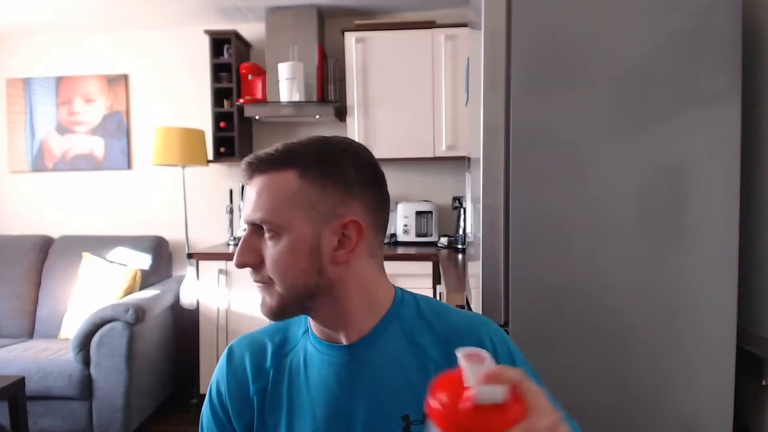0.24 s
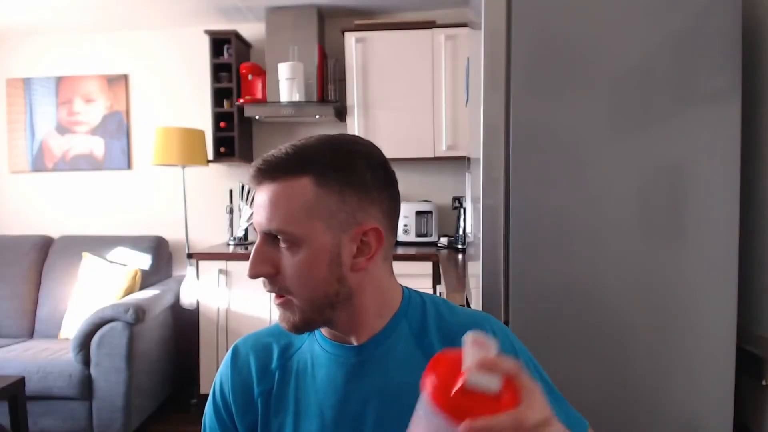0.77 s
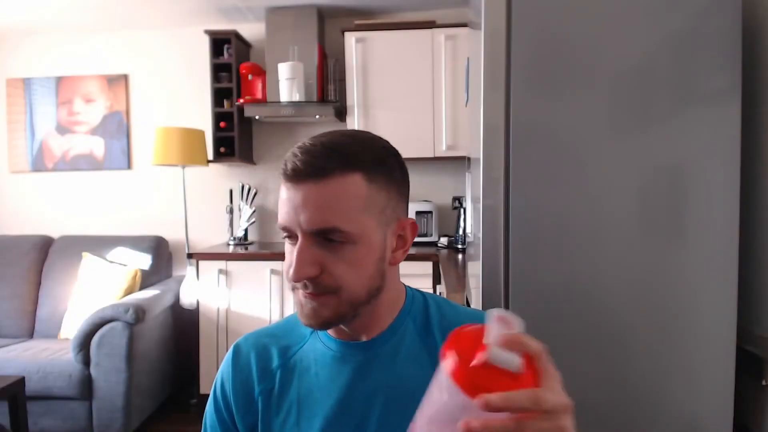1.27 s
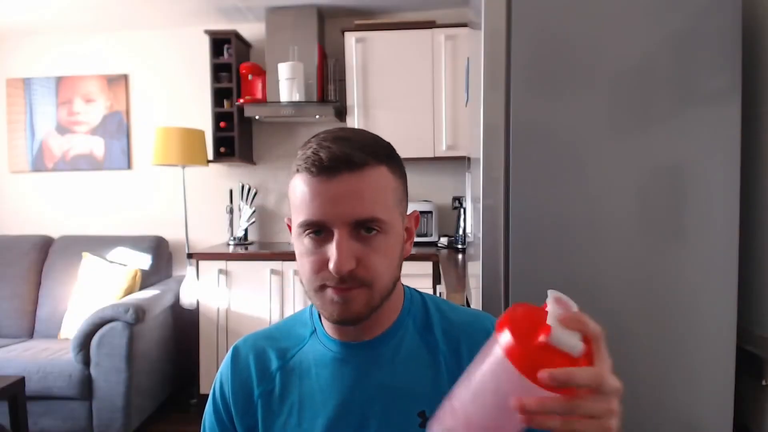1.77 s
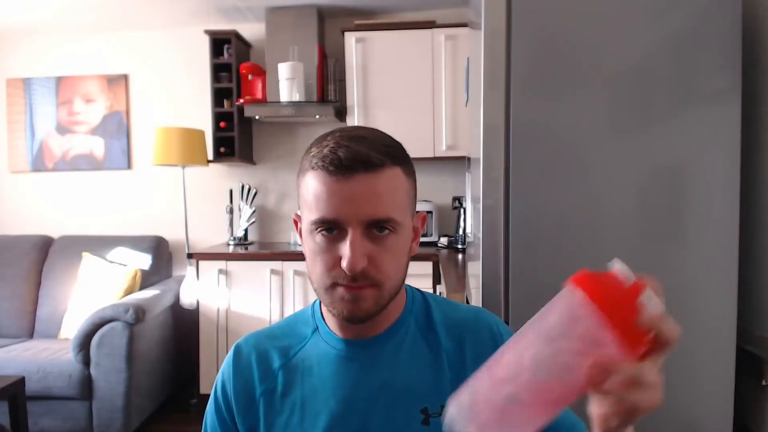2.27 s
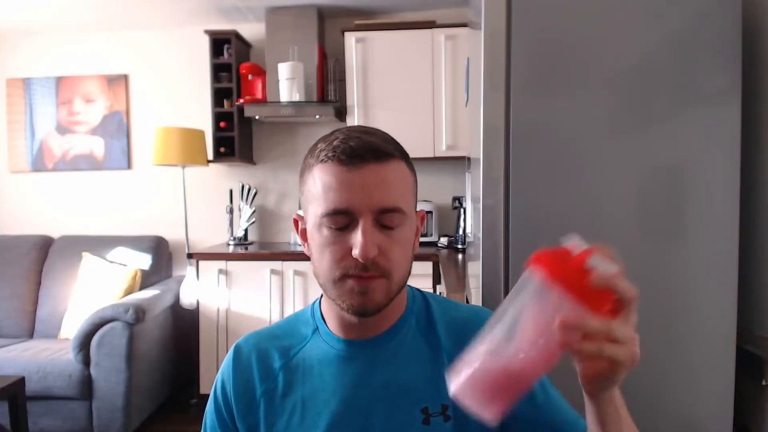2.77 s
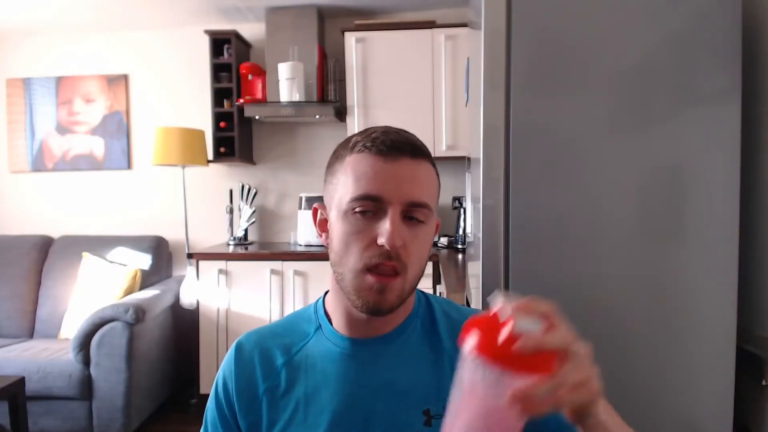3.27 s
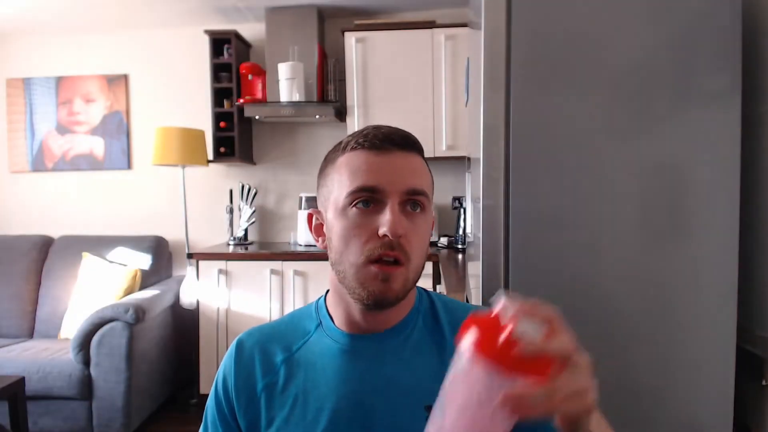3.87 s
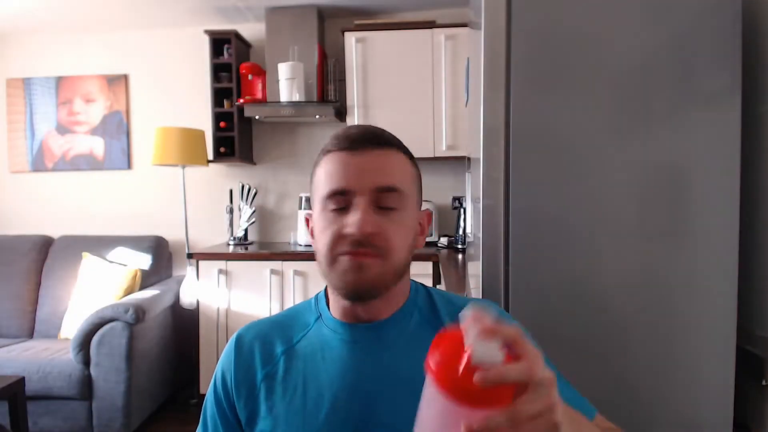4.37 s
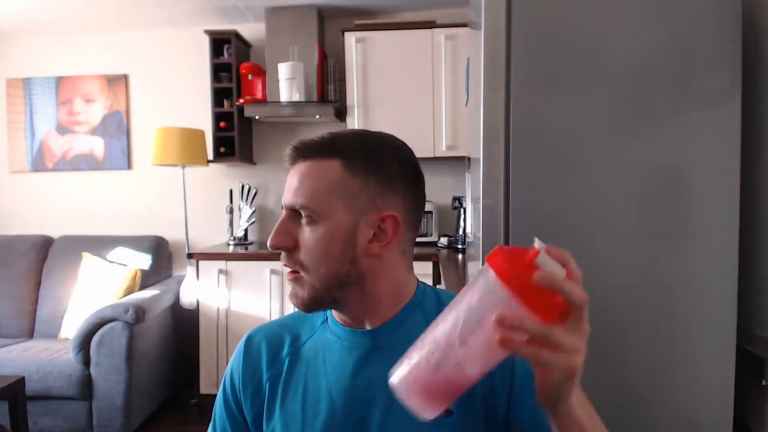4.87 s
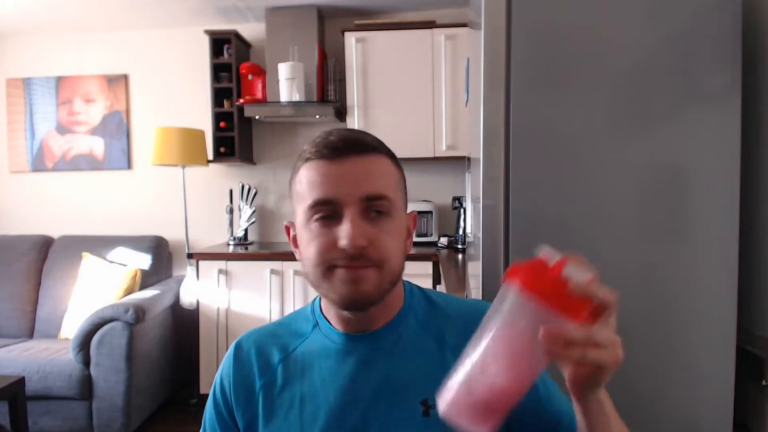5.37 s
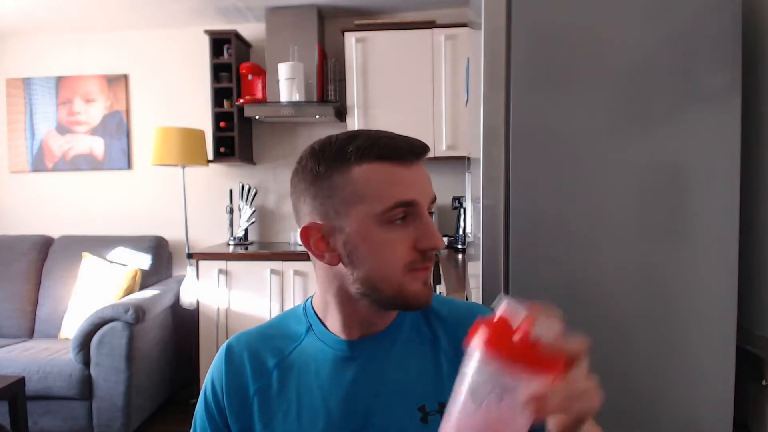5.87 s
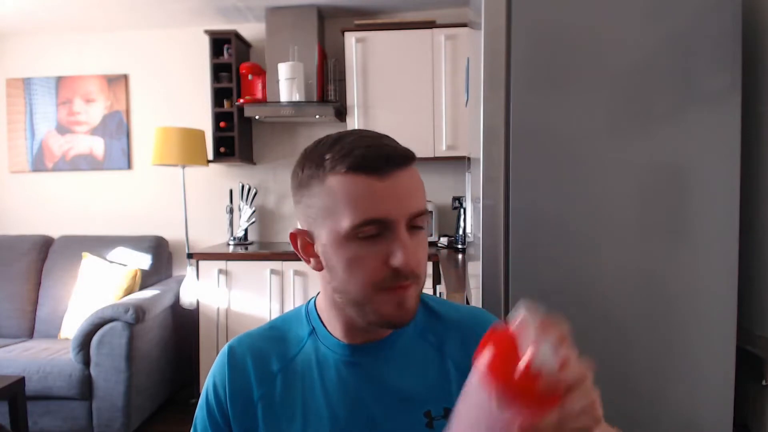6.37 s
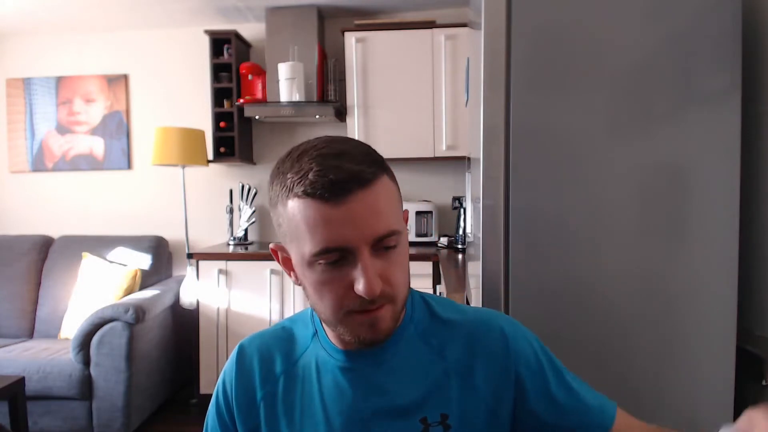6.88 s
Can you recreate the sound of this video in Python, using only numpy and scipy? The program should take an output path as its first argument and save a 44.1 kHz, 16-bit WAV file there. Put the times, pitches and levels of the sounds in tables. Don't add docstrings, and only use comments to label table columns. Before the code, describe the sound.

Vigorous shaking of a half-full plastic bottle indoors: hollow knocks, bright wire rattles and frothy liquid slosh, about three slams a second by the end.

```python
import sys
import numpy as np
from scipy import signal
from scipy.fft import rfft, irfft, next_fast_len
from scipy.io import wavfile
from scipy.ndimage import uniform_filter1d, map_coordinates

SR = 44100
rng = np.random.default_rng(int(sys.argv[2]) if len(sys.argv) > 2 else 0)


def gain_from_decibels(decibels):
    exponent = np.asarray(decibels, float) / 20
    return 10 ** exponent


def dump_mix(stems):
    frames = np.atleast_2d(stems).T
    limited = np.clip(frames, -1, 1)
    pcm = np.round(limited * 32767).astype(np.int16)
    wavfile.write(sys.argv[1], SR, pcm)


N = 314768

# (time [s], level [dB])
ARM_AIR = [
    (0, -47.5),
    (.7, -44.5),
    (1.15, -51),
    (1.24, -42),
    (1.33, -46),
    (2.4, -54.5),
    (3.7, -53),
    (4.8, -53),
    (6.1, -51),
    (7.14, -58.5),
]
# (frequency [Hz], density [dB per Hz])
AIR_SPECTRUM = [(3, -1), (6, 10), (20, -7.5), (40, -4), (70, -66), (150, -90)]
# (frequency [Hz], density [dB per Hz])
ROOM_TONE_SPECTRUM = [(30, -6), (60, 1.5), (120, -2.5), (250, -3.5), (400, -25), (1000, -28)]
# (time [s], peak level [dB])
JOLTS = [(1.818, -64), (2.48, -46), (3.045, -48), (3.332, -50), (4.099, -61), (4.49, -54), (4.832, -52),
         (5.091, -44), (5.36, -50), (5.62, -54), (5.92, -47), (6.488, -56)]

# (time [s], level [dB])
SLOSH = [(.06, -41.5), (.34, -53.5), (.65, -55), (1.16, -47.5), (1.6, -49.5), (2.0, -52), (2.58, -48),
         (2.9, -52), (3.5, -46.5), (3.73, -47), (4.4, -48), (4.84, -47.5), (5.05, -60), (5.5, -51),
         (5.75, -56.5), (5.95, -46), (6.57, -60), (7.05, -48.5)]
# (frequency [Hz], density [dB per Hz])
GURGLE_SPECTRUM = [(150, -79), (300, -15.5), (550, -7), (900, 1.5), (1350, 1.5), (2200, -3.5), (3200, -4.5),
                   (5000, -61)]
# (frequency [Hz], density [dB per Hz])
FIZZ_SPECTRUM = [(2500, -13.5), (3600, 0.5), (4400, 3), (6000, -5.5), (8000, -5.5), (10000, -15),
                 (16000, -19.5)]
FROTH_DB = -4.5

# (frequency [Hz], width [Hz], level [dB])
HOLLOW_MODES = [(350, 84.5, 2), (559.5, 49, 3.5), (760, 32, -6.5)]
# (frequency [Hz], width [Hz], level [dB])
WALL_MODES = [(870, 96, -4.5), (1100, 147, -1), (1380, 136, -2), (1850, 100, -0.5), (2257, 260, -4),
              (3240, 470, -4.5)]
# (frequency [Hz], width [Hz], level [dB])
LID_MODES = [(4090, 780, 2), (4820, 1550, 0), (8090, 2150, -6.5), (13700, 2500, -14.5)]

# (time [s], peak level [dB], bright snap [dB], air pocket frequency [Hz])
SKIDS = [(.001, -24.5, 0, 1400), (6.284, -28.5, -6, 1400), (.742, -29.5, -6, 1610), (.981, -28, -4, 1397),
         (1.241, -29, -6.5, 1380), (1.734, -22.5, -5.5, 1495), (2.748, -34.5, -11, 1380),
         (2.775, -39, -5, 1400), (3.047, -31.5, -4.5, 1790), (5.357, -33, -3.5, 785),
         (6.141, -30.5, 1, 1870), (6.199, -27, -0.5, 1880), (6.501, -40, -13, 1440), (6.567, -39, -4, 1380),
         (6.707, -40, -6, 956)]
# (time [s], peak level [dB], hollow thump [dB], bright snap [dB], air pocket frequency [Hz])
SLAMS = [(.008, -20.5, -21, 1, 2320), (.395, -22, -45, -6.5, 1850), (.76, -23.5, -20, -1.5, 1370),
         (1.619, -20.5, -33, -9, 1316), (1.832, -21.5, -17, -13.5, 1030), (2.198, -17, -12, -5.5, 873),
         (2.498, -25, -26, -17, 787), (2.792, -16.5, -12.5, -6, 1383), (3.107, -22.5, -16, -7, 1400),
         (3.412, -22, -20, -9.5, 1580), (3.689, -14.5, -15, -8.5, 1010), (3.953, -17, -17, -8.5, 1290),
         (4.2218, -24.5, -19, -9, 1190), (4.278, -22.5, -13, -6, 923), (4.51, -16.5, -14.5, -13, 1387),
         (4.867, -21, -19, -11.5, 1177), (5.106, -15.5, -18.5, -11, 1275), (5.382, -17.5, -20.5, -5, 1870),
         (5.672, -19, -16.5, -11.5, 1435), (5.971, -24.5, -11.5, -9, 1697), (6.271, -18.5, -12, -10, 1380),
         (6.512, -24.5, -5, -6.5, 910), (6.796, -20, -6.5, -7.5, 990), (7.017, -20.5, -19.5, -10, 1070)]
# (time [s], peak level [dB], bright snap [dB])
RATTLES = [(0.084, -42, -6), (0.222, -29, -11), (.571, -33, -10.5), (.624, -26, -14), (0.675, -33.5, -6),
           (.789, -33, -10), (.829, -34, -20), (.862, -27, -6.5), (1.081, -34, -5), (1.093, -29.5, -7),
           (1.136, -27, -8.5), (1.349, -27.5, -7.5), (1.467, -33, -23), (1.508, -30, -8), (1.553, -37, -12),
           (1.643, -42.5, -2), (2.062, -59, 12), (2.607, -48, -30), (3.608, -38.5, -19), (3.937, -39, -31),
           (3.876, -55, -11), (4.09, -38, -10), (4.956, -59, -14), (5.351, -31, -13), (5.529, -39, -4),
           (5.722, -53, -11), (6.683, -34.5, -6)]
# (time [s], peak level [dB], bright snap [dB], air pocket frequency [Hz])
KNOCKS = [(0.096, -23, -4, 1310), (0.502, -26.5, -6.5, 1350), (.651, -26.5, -4, 1140),
          (1.041, -25, -8, 2400), (1.32, -30, -9, 2350), (1.413, -33.5, -34, 920), (1.875, -24, -7, 1096),
          (1.968, -26, -8.5, 1070), (2.017, -32, -9.5, 1630), (2.104, -30, -6, 990),
          (2.149, -34.5, -3, 970), (2.242, -35, -23, 1440), (2.276, -28, -11, 1275),
          (2.392, -33.5, -6.5, 1000), (2.568, -30, -10, 1380), (2.941, -29, -2.5, 960),
          (2.965, -36, 0, 980), (3.067, -30, -30, 1300), (3.339, -25, -9.5, 1137), (3.647, -33, -8, 1057),
          (4.374, -38, -10, 1150), (4.688, -41, -3, 1240), (4.999, -29.5, -8.5, 1100),
          (5.283, -34.5, -4.5, 2030), (5.644, -26, -10, 1280), (5.888, -37.5, -14, 1820),
          (6.33, -30.5, -2.5, 1834), (6.617, -38, -29, 1140), (6.866, -33.5, -9, 1150),
          (6.913, -34, -10, 1000)]
# (time [s], peak level [dB])
SNAPS = [(.1281, -34), (0.2296, -24), (0.278, -27), (.497, -26), (0.837, -27), (1.117, -24), (1.233, -74),
         (1.395, -22), (1.6012, -45), (2.136, -82), (2.3518, -27), (2.4294, -26), (2.6, -23), (2.689, -47),
         (3.0335, -40), (3.76, -21.5), (4.112, -24), (4.16, -27), (4.2615, -23), (4.7663, -28),
         (5.2545, -28), (5.9184, -25.5), (6.0496, -26), (6.0721, -35), (6.094, -25), (6.433, -27),
         (6.754, -31)]
# (time [s], peak level [dB])
REBOUNDS = [(.4194, -32), (.6374, -24), (1.361, -30), (1.8517, -15), (2.5106, -14), (2.534, -16),
            (2.8134, -16), (4.5311, -15.5), (5.692, -21), (5.9988, -28), (6.351, -34), (7.0316, -11)]
SLAM_T60_S, KNOCK_T60_S, SKID_T60_S, RATTLE_T60_S = 0.065, 0.07, 0.16, 0.06
KNOCK_THUMP_DB, SKID_THUMP_DB, RATTLE_THUMP_DB = -24, -31.5, -19.5
SWIRL_POCKET_HZ = 1320

# (time [s], peak level [dB])
TICKS = [(0.7292, -38), (0.9687, -49), (1.0544, -60), (1.265, -33), (1.484, -50), (1.5529, -45),
         (2.1041, -38), (2.357, -42), (2.9138, -36), (3.1694, -32), (3.3494, -37), (3.6082, -38),
         (3.6774, -24), (3.8731, -50), (3.9883, -31), (4.0537, -28), (4.3745, -39), (4.4303, -28),
         (4.6229, -39), (4.6862, -32), (4.7014, -37), (4.9382, -32), (4.9551, -38), (5.0644, -40),
         (5.1294, -29), (5.4194, -33), (5.7488, -32), (5.8885, -34), (6.4961, -33), (6.6179, -34.5)]
WIRE_UNDER_SNAP_DB, WIRE_T60_S, WIRE_FROM_HZ = -17.5, 0.0064, 5100
TICK_GAIN_DB = -5
STRAY_PER_S, STRAY_DB, STRAY_SPREAD_DB = 31, -3.5, 1

# (time [s], length [s], level [dB])
SPRAYS = [
    (4.285, 0.15, -49),
    (1.6, 0.067, -49),
    (1.2, 0.057, -55),
    (2.64, 0.089, -58),
]
# (time [s], level [dB], first frequency [Hz], last frequency [Hz], length [s])
GLUGS = [
    (3.7, -46, 620, 450, .07),
    (1.585, -37, 1900, 1900, 0.0089),
    (4.11, -45, 3100, 3050, 0.0097),
    (2.1, -50, 2700, 2400, 0.017),
    (6.567, -47, 3200, 3270, 0.018),
    (3.3, -49, 1560, 950, .02),
]
# (frequency [Hz], t60 [s])
ROOM_DECAY = [(200, 0.17), (1500, 0.3), (10000, 0.12)]
# (frequency [Hz], gain [dB])
TREBLE_LIMIT = [(15000, 0), (15850, -2), (16050, -34), (16750, -40), (16900, -90)]


def unit(x):
    return x / np.sqrt(np.mean(x ** 2) + 1e-20)


def along(points, hz):
    f, v = np.transpose(points)
    return np.interp(np.log(hz + 1), np.log(f + 1), v)


def curves(rows):
    s, *cols = np.transpose(rows)
    return [np.interp(np.arange(N) / SR, s, c) for c in cols]


def wobble(rate):
    knots = rng.standard_normal(int(N * rate / SR) + 4)
    return map_coordinates(knots, [np.arange(N) * rate / SR])


def filtered(x, response):
    m = next_fast_len(N + SR // 2)
    return irfft(rfft(x, m) * response(np.fft.rfftfreq(m, 1 / SR)), m)[..., :N]


def resonances(modes):
    def response(f):
        total = 0
        for k, (centre, width, db) in enumerate(modes):
            damping = 1j * f * width
            total = total + (-1) ** k * gain_from_decibels(db) * damping / (centre ** 2 - f ** 2 + damping)
        return total
    return response


def hiss(spectrum):
    return unit(filtered(rng.standard_normal(N), lambda hz: gain_from_decibels(along(spectrum, hz))))


def wash(hits, level_db, t60):
    kicks = np.zeros(N)
    for s, db in hits:
        kicks[round(s * SR)] = gain_from_decibels(db + level_db)
    return signal.lfilter([1], [1, -gain_from_decibels(-60 / (t60 * SR))], kicks)


def background():
    hum_hz = 183 + 1.49 * wobble(20)
    hum = gain_from_decibels(-67.5 + 0.62 * wobble(14)) * np.sin(2 * np.pi * np.cumsum(hum_hz) / SR)
    jolts = uniform_filter1d(wash(JOLTS, level_db=-4, t60=0.11), size=300)
    tone = (gain_from_decibels(-65 + 2.2 * wobble(12.0)) + jolts) * hiss(ROOM_TONE_SPECTRUM)
    air = gain_from_decibels(curves(ARM_AIR)[0]) * hiss(AIR_SPECTRUM)
    return air + tone + hum


def bubbles(per_s, hz, octaves, cycles, spread_db):
    when, a, b, bulk = rng.random((int(per_s * N / SR), 4)).T[..., None]
    step = np.arange(200)
    turns = hz * 2 ** (octaves * (a + b - 1)) * step / SR
    fade = np.exp(-turns / cycles) * (1 - np.exp(-turns / 0.78))
    tone = np.sin(2 * np.pi * turns * (1 + 0.026 * turns)) * fade
    at = (when * N).astype(int) + step
    sizes = gain_from_decibels(spread_db * bulk ** 2)
    return unit(np.bincount(at.ravel(), (sizes * tone).ravel(), minlength=N)[:N])


def slosh():
    gurgle_db, = curves(SLOSH)
    fizz_db = gurgle_db + FROTH_DB
    surge = 1.48 * np.clip(wobble(30), -3, 1.2) + 2.42 * np.clip(wobble(90), -3, 1.5)
    blow_levels = [(s, db) for s, db, *_ in contacts()]
    snap_levels = [(s, db + snap_db) for s, db, _, snap_db, *_ in contacts()]
    dull = wash(blow_levels, level_db=-22.5, t60=0.28)
    bright = wash(snap_levels, level_db=-19.5, t60=0.28)
    gurgle = hiss(GURGLE_SPECTRUM)
    gurgle = gurgle + 1.03 * bubbles(per_s=300, hz=1400, octaves=1.153, cycles=3.4, spread_db=9)
    gurgle = gurgle * gain_from_decibels(surge + 0.35 * wobble(40)) * (gain_from_decibels(gurgle_db - 9.5) + dull)
    fizz = hiss(FIZZ_SPECTRUM)
    fizz = fizz + 0.6 * bubbles(per_s=400, hz=4890, octaves=1.105, cycles=2.6, spread_db=11)
    spray = sprays() * fizz
    fizz = fizz * gain_from_decibels(surge + 0.63 * wobble(50)) * (gain_from_decibels(fizz_db - 6.0) + bright) + spray
    in_hollow = 2.27 * filtered(gurgle, resonances(HOLLOW_MODES))
    in_wall = 0.2 * filtered(gurgle, resonances(WALL_MODES))
    return gurgle + in_hollow + in_wall + fizz


def contacts():
    slams = [(*row, SLAM_T60_S) for row in SLAMS]
    knocks = [(s, db, KNOCK_THUMP_DB, snap_db, hz, KNOCK_T60_S) for s, db, snap_db, hz in KNOCKS]
    skids = [(s, db, SKID_THUMP_DB, snap_db, hz, SKID_T60_S) for s, db, snap_db, hz in SKIDS]
    rattles = [(s, db, RATTLE_THUMP_DB, snap_db, SWIRL_POCKET_HZ, RATTLE_T60_S)
               for s, db, snap_db in RATTLES]
    return slams + knocks + skids + rattles


def chatter(t, t60, crack):
    lumps = gain_from_decibels(3.5 * np.repeat(rng.standard_normal(len(t) // 40 + 1), 40)[:len(t)])
    fade = gain_from_decibels(-60 * t / np.clip(t60, .004, 1)) * lumps + crack * gain_from_decibels(-60 * t / 0.008)
    return fade * (1 - np.exp(-t / .00015)) * rng.standard_normal(len(t))


def blows():
    size = SR // 10
    t = np.arange(size) / SR
    thump, wall, lid, pocket = np.zeros((4, N + size))
    for s, db, thump_db, snap_db, hz, t60 in contacts():
        start = round(s * SR)
        at = slice(start, start + size)
        wall[at] += gain_from_decibels(db + 1) * chatter(t, t60, crack=0.59)
        lid[at] += gain_from_decibels(db + snap_db + 4.5) * chatter(t, 0.51 * t60, crack=0.62)
        thump[at] += gain_from_decibels(db + thump_db + 15.5) * chatter(t, 1.11 * t60, crack=0.36)
        thump[start] -= gain_from_decibels(db + thump_db + 41.5)
        flutter = np.cumsum(0.11 * rng.standard_normal(size))
        ring = np.sin(2 * np.pi * hz * t + flutter)
        pocket[at] += gain_from_decibels(db - 7 - 90 * t / t60) * (1 - np.exp(-t / 0.00031)) * ring
    for s, db in REBOUNDS + SNAPS:
        lid[round(s * SR):][:size] += gain_from_decibels(db - 12) * chatter(t, 0.068, crack=0.48)
    hollow = resonances(HOLLOW_MODES)
    thump = filtered(thump[:N], lambda f: hollow(f) * 1j * f / (110 + 1j * f))
    wall = filtered(wall[:N], resonances(WALL_MODES))
    lid = filtered(lid[:N], resonances(LID_MODES))
    return thump + wall + lid + pocket[:N]


def wire():
    when, luck = rng.random((int(STRAY_PER_S * N / SR), 2)).T
    slosh_db = curves(SLOSH)[0][(when * N).astype(int)]
    stray_db = slosh_db + STRAY_DB - STRAY_SPREAD_DB * np.log(luck + 0.037)
    touches = [(s, db + snap_db + WIRE_UNDER_SNAP_DB) for s, db, _, snap_db, *_ in contacts()]
    touches += [(s, db + TICK_GAIN_DB) for s, db in TICKS]
    touches += list(zip(when * N / SR, stray_db))
    t = np.arange(SR // 50) / SR
    out = np.zeros(N + len(t))
    for s, db in touches:
        out[round(s * SR):][:len(t)] += gain_from_decibels(db - 60 * t / WIRE_T60_S) * rng.standard_normal(len(t))
    return filtered(out[:N], lambda f: 1j * f / (WIRE_FROM_HZ + 1j * f))


def room(x):
    hz, t, z = signal.stft(rng.standard_normal(SR // 2), SR, nperseg=256)
    decay = gain_from_decibels(-60 * t / along(ROOM_DECAY, hz)[:, None])
    tail = signal.istft(z * decay, SR, nperseg=256)[1]
    delayed = np.pad(x, (200, 0))
    return signal.fftconvolve(delayed, tail / np.linalg.norm(tail))[:N]


def sprays():
    t = np.arange(N) / SR
    level = np.zeros(N)
    for s, length, db in SPRAYS:
        arch = np.sin(np.pi * np.clip((t - s) / length, 0, 1)) ** .5
        level += gain_from_decibels(db) * arch * (t < s + length)
    return level


def glugs():
    out = np.zeros(N)
    for s, db, from_hz, to_hz, length in GLUGS:
        u = np.linspace(0, 1, int(length * SR))
        turns = np.cumsum(from_hz + (to_hz - from_hz) * u) / SR
        out[round(s * SR):][:len(u)] = gain_from_decibels(db) * np.sin(np.pi * u) * np.sin(2 * np.pi * turns)
    return out


def scene():
    bottle = blows() + slosh() + glugs() + wire()
    return (bottle + gain_from_decibels(-14.5) * room(bottle) + background())[None]


def roll_off(x):
    return signal.sosfilt(signal.butter(12, 16820, fs=SR, output="sos"), x)


def record(dry):
    mix = filtered(dry, lambda hz: gain_from_decibels(along(TREBLE_LIMIT, hz)))
    return roll_off(mix)


dry = scene()
out = record(dry)
dump_mix(out)
```